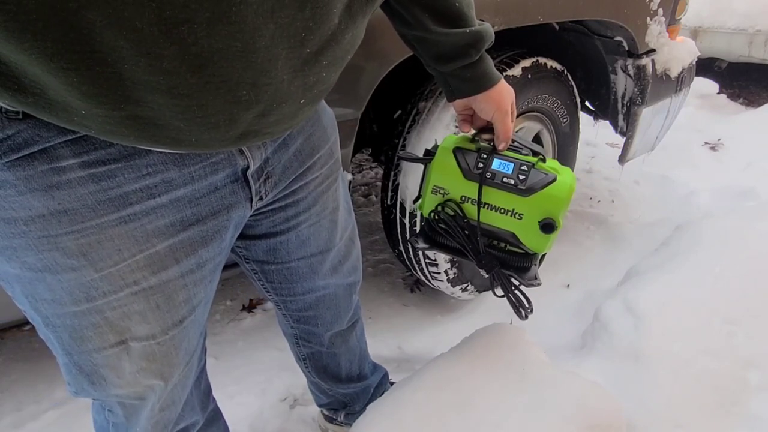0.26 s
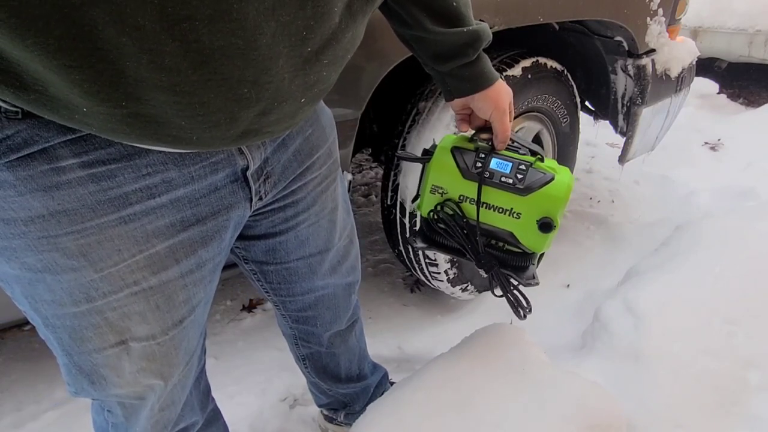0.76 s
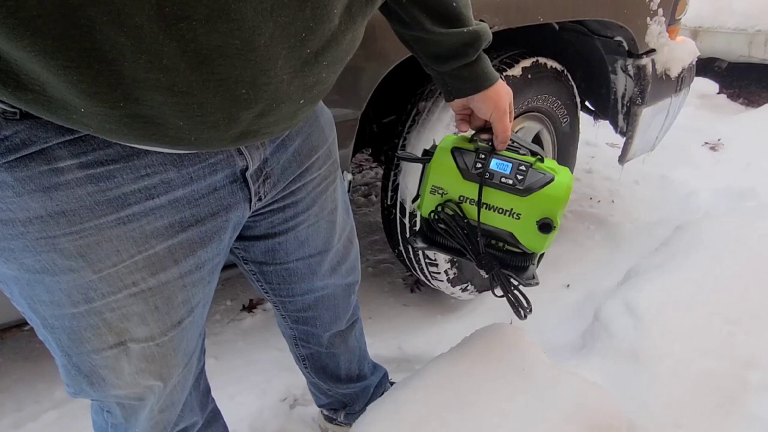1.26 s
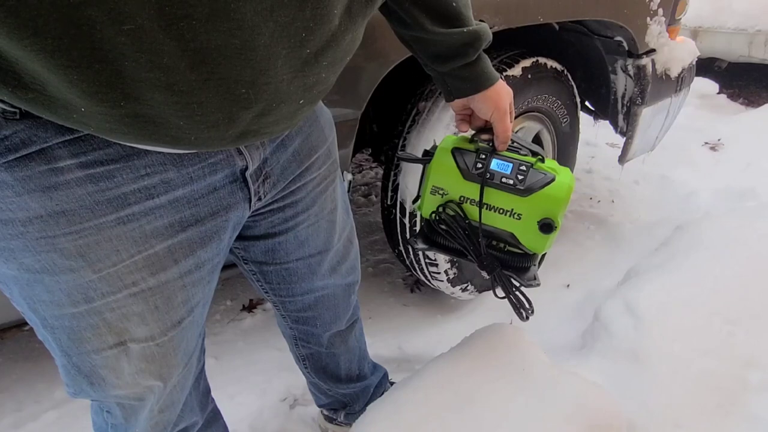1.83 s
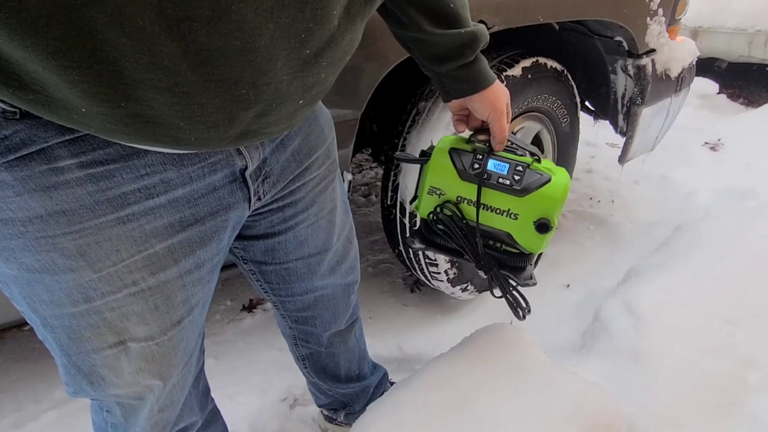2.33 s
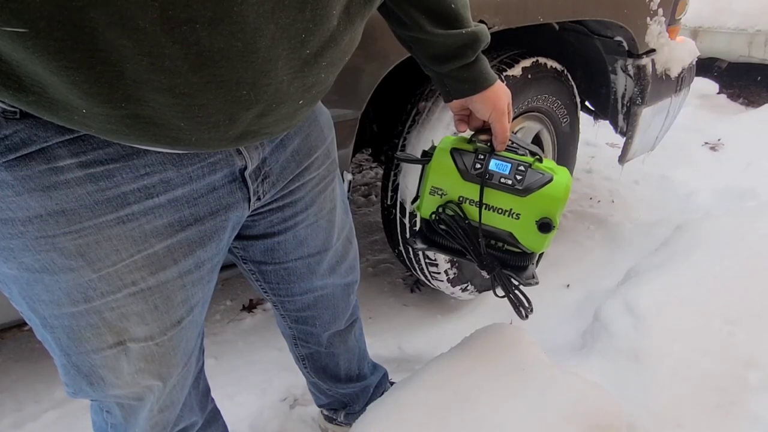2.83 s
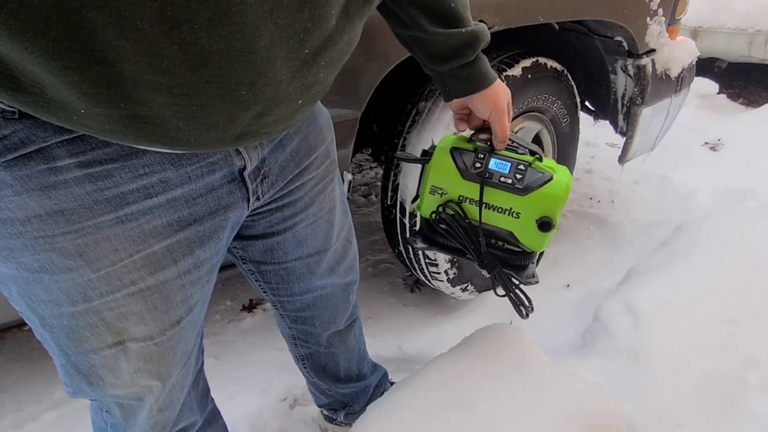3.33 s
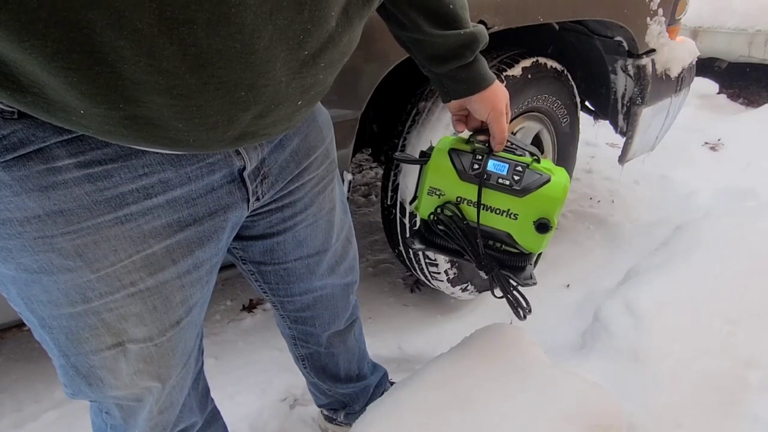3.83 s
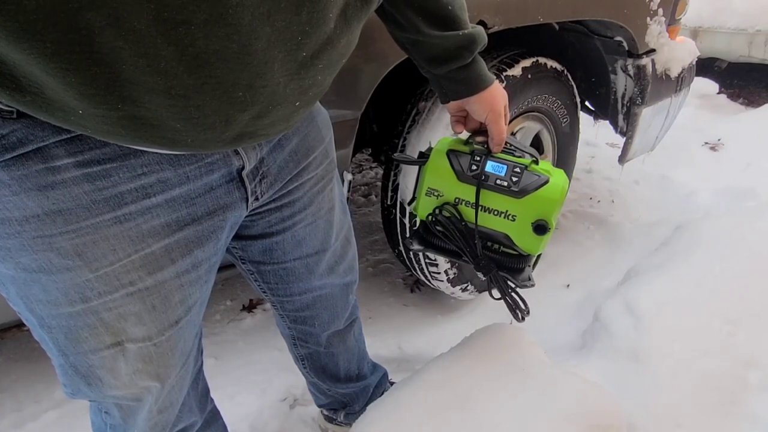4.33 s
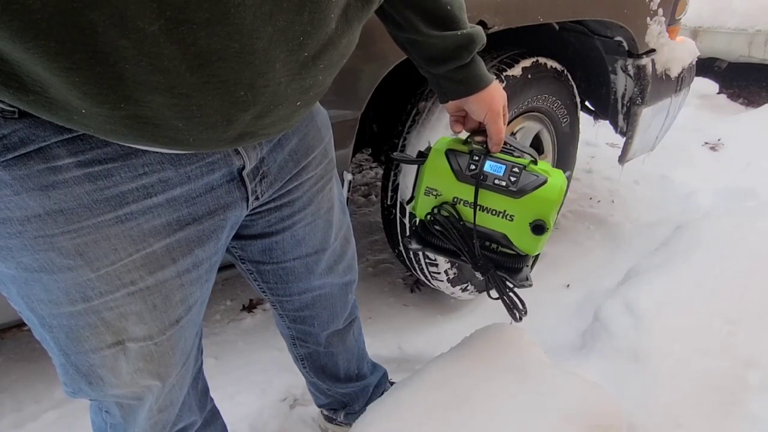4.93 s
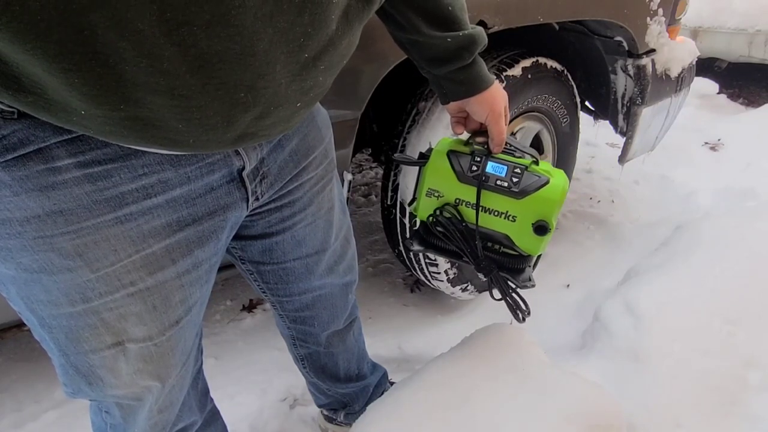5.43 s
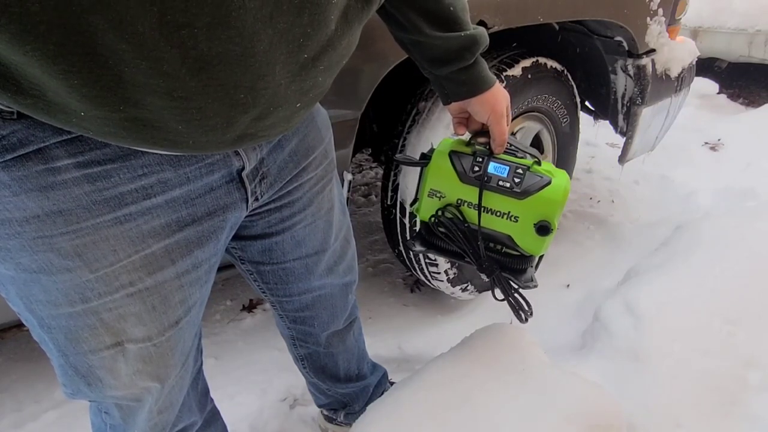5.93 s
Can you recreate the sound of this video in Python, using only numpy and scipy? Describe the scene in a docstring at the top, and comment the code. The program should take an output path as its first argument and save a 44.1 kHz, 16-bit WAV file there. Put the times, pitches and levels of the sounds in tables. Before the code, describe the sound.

Continuous harsh buzz of a hand-held tire inflator, its motor droning and air hissing brightly over a low engine rumble, never pausing.

```python
"""In the snow beside an idling truck, a hand-held battery compressor pumps up a tire.
A small motor drives the piston through one gear pair, about 45 crank turns a second.
Tones make the motor's drone, the piston's throb, the gear whine, the reed's ring and brief rattle peaks.
Filtered noise makes the case rattle, the hissing air and the chirping valve, each shaped by the crank.
The truck is a row of camshaft orders over a low rumble."""
import sys
import numpy as np
from scipy import signal
from scipy.fft import rfft, irfft
from scipy.io import wavfile

SR = 44100
rng = np.random.default_rng(int(sys.argv[2]) if len(sys.argv) > 2 else 0)


def unload_audio(sound):
    """Save the sound as a 16-bit wav file, at the path given as the first command line argument."""
    columns = np.transpose(np.atleast_2d(sound))
    # keep every value between -1 and 1, then stretch to whole-number steps
    steps = np.round(np.clip(columns, -1, 1) * 32767)
    wavfile.write(sys.argv[1], SR, steps.astype(np.int16))


N = 272524
TIME_S = np.arange(N) / SR
BINS_HZ = np.fft.rfftfreq(N, 1 / SR)


def amp(db):
    """Decibels to gain."""
    return 10 ** (np.asarray(db) / 20)


def unit(x):
    """Scales to rms 1."""
    return x / np.sqrt(np.mean(x ** 2) + 1e-20)


def read(points, hz):
    """Interpolates a table along a log-frequency axis."""
    table_hz, value = np.transpose(points)
    return np.interp(np.log(hz + 1), np.log(table_hz + 1), value)


def colour(hz, spectrum, modes):
    """Gain of a smooth spectrum with peaks and dips added in dB."""
    modes_db = sum(db / (1 + (2 * (hz - centre_hz) / width_hz) ** 2) for centre_hz, width_hz, db in modes)
    return amp(read(spectrum, hz) + modes_db)


def wander(hz):
    """Slow random drift of rms 1: noise under a Gaussian low-pass."""
    lowpass = np.exp(-(BINS_HZ / hz) ** 2)
    return unit(irfft(rfft(rng.standard_normal(N)) * lowpass, N))


def tone(cycles, lag_rad):
    """Stereo sine of rms 1 whose left side lags."""
    angle_rad = 2 * np.pi * cycles
    return np.sqrt(2) * np.cos([angle_rad - lag_rad, angle_rad])


# likeness of the two sides: freq_hz, correlation
SIDE_LIKENESS = [(40, .995), (120, .985), (300, .9), (650, .82), (1000, .25), (1600, .45), (2300, .4),
                 (3200, 0), (4700, -.4), (7000, -.05), (15000, -.15)]


def flow(envelope, spectrum, modes=()):
    """Stereo turbulence of rms 1: enveloped noise, partly shared by the sides, through a spectrum."""
    a, b = rfft(rng.standard_normal((2, N)) * envelope)
    same = np.clip(read(SIDE_LIKENESS, BINS_HZ), -1, 1)
    sides = np.array([a, same * a + np.sqrt(1 - same ** 2) * b])
    return unit(irfft(sides * colour(BINS_HZ, spectrum, modes), N))


# crank angle of peak pressure
PEAK_TURN = 0.008


def stroke(crank, half_width_turns, steep, after_db, fade_db_per_turn):
    """Each turn, a hump of compression, then a release that fades."""
    age = (crank - PEAK_TURN) % 1
    distance = np.minimum(age, 1 - age)
    hump = .5 ** ((distance / half_width_turns) ** steep)
    return np.maximum(hump, amp(after_db - fade_db_per_turn * age))


# engine orders: cam_multiple, level_db
ENGINE_ORDERS = [(5, -54), (6, -57), (8, -42), (11, -46), (16, -44), (19, -45), (23, -34.5)]
# camshaft speed: turns per s
CAM_HZ = 6.65
# rumble spectrum: freq_hz, relative_db_per_hz
ENGINE_RUMBLE = [(10, -28), (30, -24), (50, -10.5), (90, 0), (150, -4.5), (175, -11.5), (260, -7),
                 (370, -15.5), (500, -14), (900, -71)]


def truck(rumble_db=-34, hunting=0.0025, waver_db=1.0):
    """An eight-cylinder engine idles: camshaft orders over a low rumble."""
    cam = np.cumsum(CAM_HZ * (1 + hunting * wander(2.3))) / SR
    orders = 0
    for multiple, db in ENGINE_ORDERS:
        gain = amp(db + waver_db * wander(21))
        orders = orders + gain * tone(round(multiple) * cam + rng.random(), lag_rad=0)
    return orders + amp(rumble_db) * flow(1, ENGINE_RUMBLE)


# moments when the rattle's low band happens to peak: centre_s, relative_db
RATTLE_PEAKS = [(.073, -9), (.558, -13), (0.956, -4.5), (1.033, -9.5), (2.26, -12), (3.238, -3.5),
                (3.724, -6.5), (4.704, -13), (5.558, -11)]


def rattle_peaks(level_db=-8.5, peak_hz=600, length_s=0.0068):
    """Brief 600 Hz swells at chance peaks of the rattle."""
    swell = sum(amp(db) * np.exp(-((TIME_S - centre_s) / length_s) ** 2) for centre_s, db in RATTLE_PEAKS)
    return amp(level_db) * swell * tone(peak_hz * TIME_S, lag_rad=0.88)


# hollow plastic case spectrum: freq_hz, relative_db_per_hz
CASE_SPECTRUM = [(300, -84), (400, -21), (470, -12.5), (520, -4.5), (590, -1), (660, -5.5), (715, -9),
                 (770, -15), (900, -15), (1050, -12), (1350, -13.5), (1500, -19), (2000, -17.5),
                 (3500, -42)]
# crank angle at which the piston draws air in
INTAKE_TURN = 0.67


def case(crank, level_db=-23.5, uneven_db=1.06, lull_db=-2.0, lull_width_turns=0.12):
    """The shaking pump rattles the hollow plastic case, with a lull at each intake."""
    from_intake = (crank - INTAKE_TURN + .5) % 1 - .5
    intake = np.exp(-(from_intake / lull_width_turns) ** 2)
    envelope = amp(lull_db * intake + uneven_db * wander(56))
    return amp(level_db) * flow(envelope, CASE_SPECTRUM)


# gear pair and motor: tooth and slot counts
WHEEL_TEETH = 53
PINION_TEETH = 11
ROTOR_SLOTS = 3
# slot tone and its sidebands: offset_crank_multiples, level_db
ROTOR_DRONE = [(-1, -29.3), (0, -24.2), (1, -37), (2, -45), (4, -51)]


def motor(crank, waver_db=0.55, drag_turns=0.12):
    """Rotor slots pass the magnets; each stroke slows them, making sidebands of opposite sign."""
    flutter_cycles = 0.014 * wander(20)
    slots = crank * ROTOR_SLOTS * WHEEL_TEETH / PINION_TEETH + flutter_cycles
    drone = 0
    for offset, db in ROTOR_DRONE:
        sign = -1 if offset > 0 else 1
        gain = sign * amp(db + waver_db * wander(3.7))
        drone = drone + gain * tone(slots + offset * (crank - drag_turns), lag_rad=0.68)
    return drone


# throb as the case radiates it: freq_hz, harmonic_db before the panels
PISTON_THROB = [(45, -45), (90, -41.5), (150, -59), (225, -44), (360, -53.5), (406, -37), (496, -43),
                (541, -32), (720, -41), (790, -50), (1000, -41), (1400, -70), (2500, -57), (2900, -61)]
# panels that ring with it: centre_hz, width_hz, boost_db
CASE_PANELS = [(2130, 75, 18.5), (2580, 110, 22)]


def piston(crank, late_turns=0.1465, scatter_rad=1.75, lag_rad=0.06, count=60):
    """One push a turn, smeared by the case into a throb; it reaches the left side slightly later."""
    turn = np.linspace(0, 1, 1024, endpoint=False)
    orders = np.arange(1, count + 1)
    mean_crank_hz = crank[-1] / TIME_S[-1]
    gains = colour(orders * mean_crank_hz, PISTON_THROB, CASE_PANELS)
    throb = 0
    for order, gain in zip(orders, gains):
        smear_cycles = scatter_rad * rng.standard_normal() / (2 * np.pi)
        throb = throb + gain * tone(order * (turn - late_turns) + smear_cycles, lag_rad * order)
    return np.array([np.interp(crank, turn, side, period=1) for side in throb])


# how the gear housing passes the whine: freq_hz, relative_db
GEAR_HOUSING = [(2150, -6), (2255, 6), (2300, 0), (2345, 1), (2390, -0.8), (2435, 4), (2480, -3),
                (2600, -2), (4000, 0)]


def gears(crank, level_db=-27.0, uneven_db=.5, sag_cycles=0.045):
    """Teeth sing while the piston presses them together; the load slows them a little."""
    slack_cycles = .012 * wander(100)
    mesh = WHEEL_TEETH * crank - sag_cycles * np.sin(2 * np.pi * crank) + slack_cycles
    load = stroke(crank, half_width_turns=0.16, steep=4.0, after_db=-4.0, fade_db_per_turn=25)
    whine = load * amp(uneven_db * wander(27)) * tone(mesh, lag_rad=0.47)
    housed = irfft(rfft(whine) * amp(read(GEAR_HOUSING, BINS_HZ)), N)
    return amp(level_db) * unit(housed)


# air hiss spectrum: freq_hz, relative_db_per_hz
AIR_SPECTRUM = [(700, -38), (1200, -9.5), (1850, -6), (2200, -2), (2500, -1), (2950, -2.5), (3500, -4),
                (4000, -4), (5050, -4), (5500, -3.5), (7200, -8.5), (9000, -15.5), (11500, -12),
                (16000, -30)]
# peaks and dips in the hiss spectrum: centre_hz, width_hz, change_db
AIR_PEAKS_AND_DIPS = [(2078, 55, 11), (2400, 100, 3), (2520, 60, -3), (2970, 100, 3), (4000, 250, -4),
                      (4730, 200, 4), (5030, 200, -5), (6800, 300, 4)]


def air(crank, level_db=-24.5, grain_db=-0.6, uneven_db=1.17):
    """Air rushes through the pump in a puff each stroke."""
    puffs = stroke(crank, half_width_turns=0.27, steep=1.6, after_db=0.1, fade_db_per_turn=6.0)
    roughness = amp(grain_db * wander(1200) + uneven_db * wander(56))
    return amp(level_db) * flow(puffs * roughness, AIR_SPECTRUM, AIR_PEAKS_AND_DIPS)


# valve hiss spectrum: freq_hz, relative_db_per_hz
VALVE_SPECTRUM = [(7000, -40), (9000, -22), (9700, -13), (10600, -15), (11400, -14), (12300, -5),
                  (13000, -4), (13800, -1), (15000, -1), (15600, 1)]
# reed resonances: centre_hz, width_hz, boost_db
REED_MODES = [(9470, 240, 10), (13450, 280, 4), (13900, 250, 2), (14680, 420, 6), (15400, 300, 2)]


def valve(crank, level_db=-18.5, uneven_db=2.2, chatter_db=-1.2):
    """Air whistles past the reed valve, a little differently every stroke."""
    lift = stroke(crank, half_width_turns=.13, steep=1.9, after_db=-2.0, fade_db_per_turn=9)
    roughness = amp(uneven_db * wander(90) + chatter_db * wander(1500))
    return amp(level_db) * flow(lift * roughness, VALVE_SPECTRUM, REED_MODES)


# ring of the opening reed: freq_hz, relative_db, left_lag_rad
REED_PARTIALS = [(9450, -39, 1.6), (12400, -34, 2.2), (13450, -28, 2.2), (14650, -23, 1.6)]


def reed(crank, level_db=3.0, early_turns=0.044, rise_turns=0.08, jitter_turns=0.011,
         uneven_db=1.1, detune_hz=120):
    """Once a turn the reed snaps open and rings for a few milliseconds."""
    age_rises = (crank + early_turns + jitter_turns * wander(30)) % 1 / rise_turns
    ring = 0
    for hz, db, lag_rad in REED_PARTIALS:
        cycles = np.cumsum(hz + detune_hz * wander(194.7)) / SR
        ring = ring + amp(db + uneven_db * wander(60)) * tone(cycles, lag_rad)
    return amp(level_db) * age_rises * np.exp(1 - age_rises) * ring


# crank speed, sagging a little as the tire fills: time_s, turns_per_s
CRANK_SPEED = [(0.0, 45.376), (0.84, 45.265), (1.19, 45.285), (1.41, 45.113), (2.11, 45.226),
               (2.32, 45.011), (2.91, 44.972), (3.17, 45.183), (3.24, 45.063), (4.23, 45.116), (4.8, 45.07),
               (5.26, 45.147), (5.68, 45.035), (6.18, 45.169)]


def scene():
    """The crank drives every compressor part; the rattle peaks and the truck run apart from it."""
    crank = np.cumsum(np.interp(TIME_S, *np.transpose(CRANK_SPEED))) / SR
    compressor = sum(part(crank) for part in (case, motor, piston, gears, air, valve, reed))
    return truck() + rattle_peaks() + compressor


# microphone pair: freq_hz, left_minus_right_db
MIC_BALANCE = [(60, -0.5), (92, -0.5), (140, -1.5), (210, -4.5), (330, 1.0), (500, 2.5), (770, 0.5),
               (1170, 1.0), (1790, -4.0), (2740, -3.0), (4190, -0.5), (6410, -0.5), (9810, -4.0),
               (15000, -5.5)]
# upper band limit: hz
EDGE_HZ = 15600


def record(dry):
    """Two microphones of different colour, then a low-pass band limit."""
    sides = amp(np.outer([.5, -.5], read(MIC_BALANCE, BINS_HZ)))
    sides = sides / np.sqrt(np.mean(sides ** 2, axis=0))
    heard = irfft(rfft(dry) * sides, N)
    edge = signal.firwin(601, EDGE_HZ, window=("kaiser", 9), fs=SR)
    return signal.oaconvolve(heard, edge[None], "same")


dry = scene()
out = record(dry)
unload_audio(out)
```